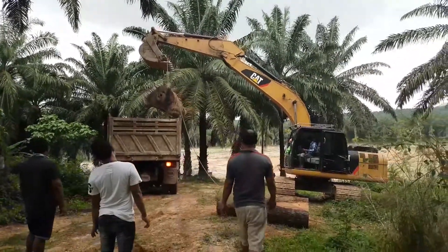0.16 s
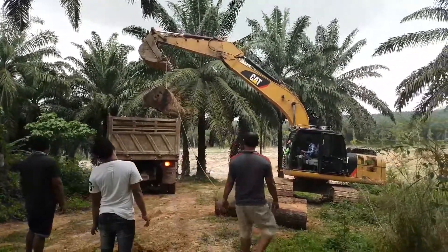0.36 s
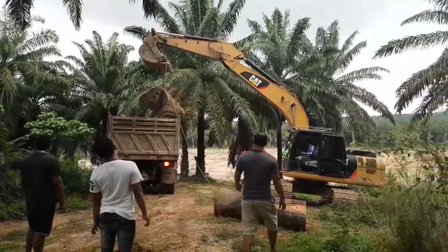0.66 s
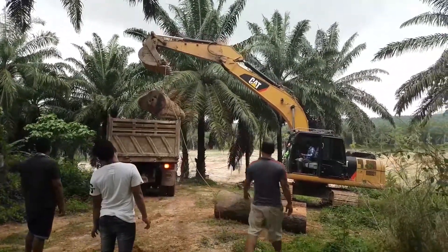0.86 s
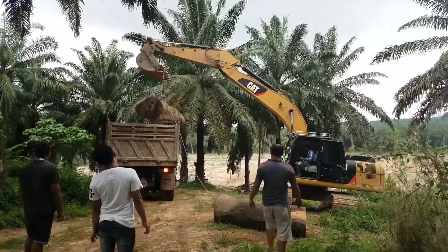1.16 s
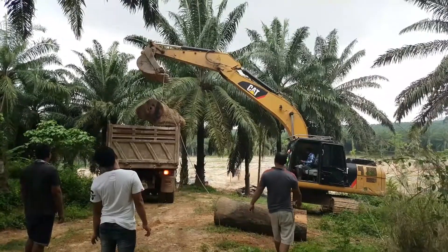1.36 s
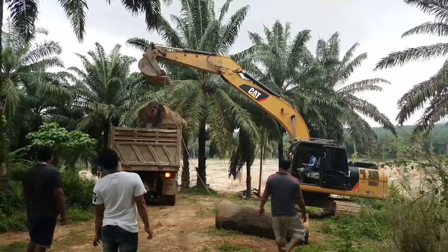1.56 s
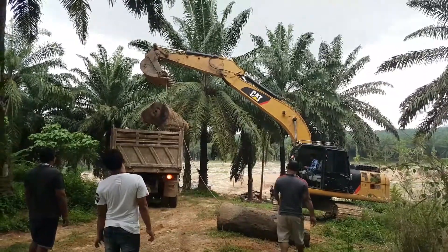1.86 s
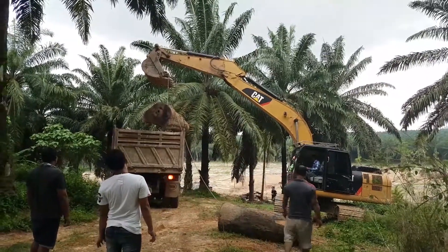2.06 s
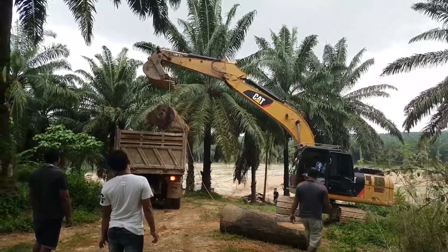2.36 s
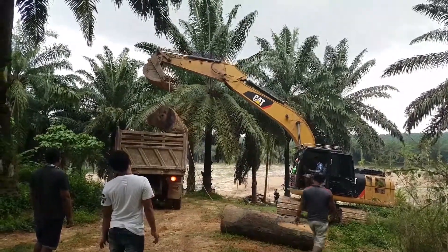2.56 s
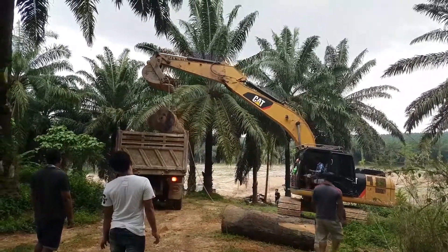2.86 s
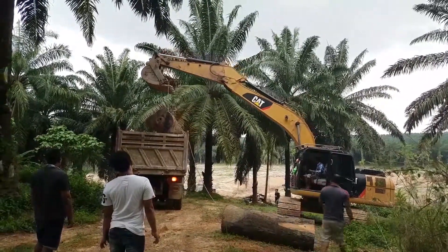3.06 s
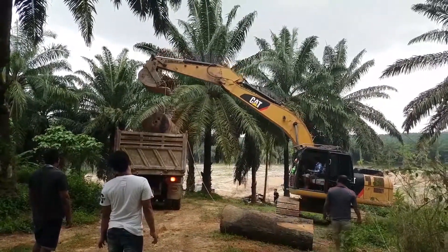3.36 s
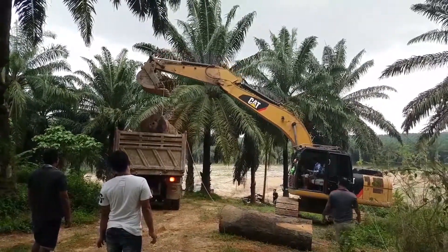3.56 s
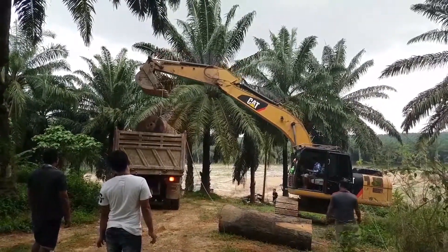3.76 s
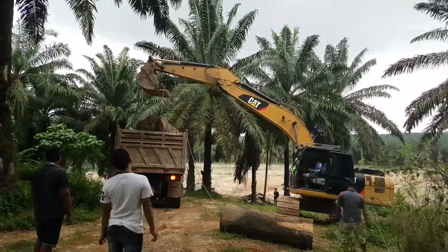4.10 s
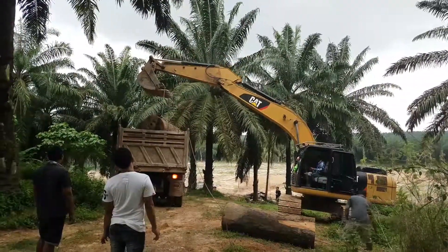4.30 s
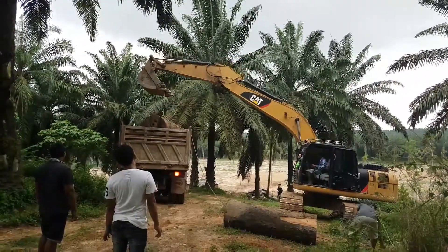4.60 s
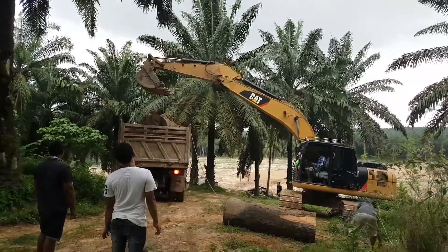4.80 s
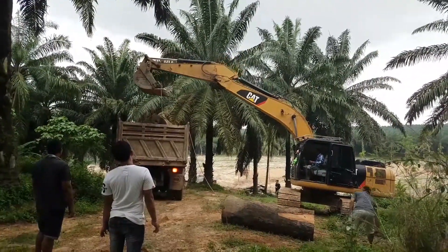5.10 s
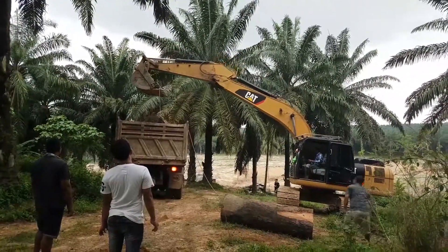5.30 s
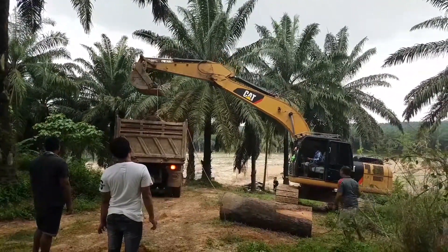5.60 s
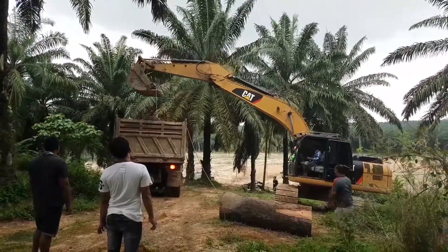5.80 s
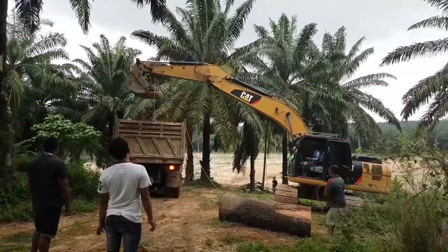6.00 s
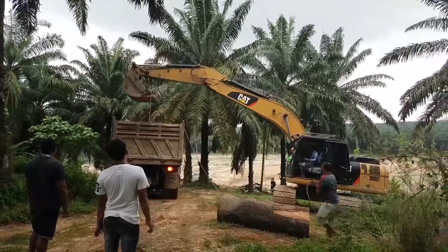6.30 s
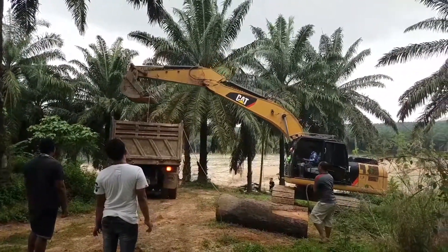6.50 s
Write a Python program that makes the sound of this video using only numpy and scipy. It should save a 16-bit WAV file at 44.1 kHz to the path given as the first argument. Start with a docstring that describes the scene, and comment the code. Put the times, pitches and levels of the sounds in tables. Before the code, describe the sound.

Strong low wind rumble buffets the microphone at first, then eases, returning in short gusts around four to five seconds. Beneath it a heavy diesel engine runs continuously at moderate distance, with a tonal hum, faint repeating valve clatter, hydraulic oil rush and fan noise. Wide, steady hiss from water and foliage fills both sides of the open-air stereo scene.

```python
"""The steady drone of a six-cylinder diesel excavator near 1300 rpm, some way off beside a river.
Firings and hydraulic pump hum as shaft-locked tones; the valve gear is a pattern repeated every cycle.
Shaped noise makes the fan rush, the oil flow and the low rumble of moving air that swells and ebbs.
River and leaves hiss all around the two microphone ports, and the top of the hiss brightens once."""
import sys
import numpy as np
from scipy import signal
from scipy.fft import rfft, irfft, next_fast_len
from scipy.io import wavfile
from scipy.ndimage import uniform_filter1d

SR = 44100
rng = np.random.default_rng(int(sys.argv[2]) if len(sys.argv) > 2 else 0)


def log_audio(samples):
    """Write samples as a 16-bit WAV file to the path given in sys.argv[1]."""
    # one column per channel
    frames = np.atleast_2d(samples).T
    # limit to full scale, then quantise
    limited = np.clip(frames, -1, 1)
    pcm = np.round(limited * 32767).astype(np.int16)
    wavfile.write(sys.argv[1], SR, pcm)


N = 293265

# crankshaft speed before hunting; it rises while the boom moves: time_s, speed_rpm
ENGINE_SPEED = [(0.0, 1327), (0.8, 1320), (1.2, 1306), (1.7, 1284), (2.2, 1277), (2.7, 1296), (3.2, 1287),
                (3.6, 1285), (4.0, 1353), (4.6, 1340), (5.2, 1294), (5.7, 1295), (6.65, 1288)]
REST_RPM, WORKING_RPM = 1295, 1341  # no load, full load


def undb(db):
    """Decibels to gain."""
    return 10 ** (np.asarray(db) / 20)


def unit(x):
    """Scale to rms 1."""
    return x / np.sqrt(np.mean(x ** 2))


def curves(table):
    """Each column of a timed table, sample by sample."""
    time_s, *columns = np.transpose(table)
    return [np.interp(np.arange(N) / SR, time_s, column) for column in columns]


def gain_at(points, hz):
    """Gain of a (Hz, dB) spectrum at given frequencies, interpolated over log frequency."""
    point_hz, point_db = np.transpose(points)
    return undb(np.interp(np.log(np.maximum(hz, 1)), np.log(point_hz), point_db))


def colour(x, points, power=1):
    """Filter by a spectrum whose gain is raised to a power."""
    size = next_fast_len(N)
    gain = gain_at(points, np.fft.rfftfreq(size, 1 / SR)) ** power
    return irfft(rfft(x, size) * gain, size)[..., :N]


def noise(points):
    """Noise of a given spectrum, rms 1."""
    return unit(colour(rng.standard_normal(N), points))


def walk(rate):
    """Smooth chance with about `rate` turns a second, rms 1."""
    values = rng.standard_normal(1024)
    joined = np.interp(np.arange(N) / SR * rate, np.arange(1024), values)
    return unit(uniform_filter1d(joined, int(SR / rate / 2)))


def swell(peak_s, length_s):
    """A smooth rise to 1 and back, once."""
    return np.cos(np.pi * np.clip((np.arange(N) / SR - peak_s) / length_s, -.5, .5))


def steady(x, window_s=.085):
    """Even out the chance swells of a noise, keeping its fast grain."""
    return x / np.sqrt(uniform_filter1d(x ** 2, int(window_s * SR)))


def scatter(x, echo=0.069, spread_s=.025, count=20):
    """Faint short echoes give the hiss a finely rippled colour."""
    lags = (rng.uniform(.1, 1, count) * spread_s * SR).astype(int)
    echoes = sum(np.roll(x, lag) for lag in lags)
    return unit(x + echo * echoes)


def ports(x, lag_s):
    """One source at two ports; it stands to the right, so the left port hears it later."""
    t = np.arange(N) / SR
    return np.array([np.interp(t - lag_s, t, x), x])


def engine_load():
    """Load read from the engine speed: 0 at rest, 1 while the boom is working."""
    above_rest = curves(ENGINE_SPEED)[0] - REST_RPM
    return np.clip(above_rest / max(WORKING_RPM - REST_RPM, 1), 0, 1)


def river(flutter_db=0.37):
    """Water and leaves hiss from all sides, unrelated at the two ports."""
    # hiss spectrum, relative: frequency_hz, density_db
    hiss_spectrum = [(200, 1.5), (900, -5.5), (1400, 2), (2400, 2.5), (3150, -3.5), (4050, -2.5),
                     (5000, -6), (5700, -10), (8200, -11), (9300, -19), (10400, -17), (11600, -13.5),
                     (13300, -16), (16000, -16.5)]
    # balance of the hiss, left minus right: frequency_hz, difference_db
    hiss_balance = [(500, 0), (1200, 2.5), (1800, -5.5), (2500, -2), (4000, -4.5), (6000, -2.5), (8000, 0),
                    (9400, -0.5), (11500, -1), (15000, -3)]
    # hiss level before the flutter: time_s, level_db
    hiss_level = [(0, -44), (.6, -42.5), (2.6, -41.5), (4.4, -43.5), (4.67, -41.4), (4.9, -42.5),
                  (6.65, -42)]
    # half of the balance goes to each port, with opposite sign
    left = colour(scatter(noise(hiss_spectrum)), hiss_balance, .5)
    right = colour(scatter(noise(hiss_spectrum)), hiss_balance, -.5)
    return np.array([left, right]) * undb(curves(hiss_level)[0] + flutter_db * walk(11))


def sizzle(peak_s=2.373, length_s=.85, peak_db=-57):
    """The top of the hiss brightens for a moment: a high noise band, unrelated at the ports."""
    band = [(6000, -30), (9500, 0), (13500, 5), (16000, -9)]
    return np.array([noise(band), noise(band)]) * undb(peak_db) * swell(peak_s, length_s)


def rumble(pan_db=-0.27, deep_waver_db=1.0):
    """Breeze and gusts drive rumble and burble together over a deep bass, nearly alike at both ports."""
    # spectra of the rumble, the deep bass and the rough burble above, relative: frequency_hz, density_db
    rumble_spectrum = [(18, -23), (30, -22), (45, -21), (68, -17), (90, 1), (108, -3.5), (128, 1.5),
                       (155, -4.5), (200, -10.5), (260, -17), (380, -29), (600, -37), (1500, -78)]
    deep_spectrum = [(15, -30), (25, -25), (35, -7), (52, -5), (72, 8.5), (100, -0.5), (160, -19),
                     (400, -67.5)]
    burble_spectrum = [(130, -55), (190, -5.5), (222, -2), (260, -4.5), (305, -4), (350, -22), (430, -14),
                       (520, -19.5), (1000, -66)]
    # filter for the part that differs between the ports: frequency_hz, gain_db
    side_filter = [(30, -24), (80, -20.5), (160, -18.5), (300, -9.5), (600, -8)]
    # strength of the breeze, as its rumble level before gusts: time_s, level_db
    breeze = [(0, -19), (.7, -20.5), (1.4, -26.5), (2.05, -26.5), (2.55, -29), (3.35, -26.5), (3.7, -30),
              (4.2, -28), (4.9, -23.5), (5.7, -30), (6.3, -29.5), (6.65, -35.5)]
    # short gusts on top of the breeze: peak_s, length_s, rise_db
    gusts = [(.05, 0.057, 5.5), (0.166, .07, 4), (0.39, 0.18, 5), (0.596, 0.13, 4.5), (1.897, 0.32, 2.5),
             (2.74, 0.11, 5.5), (3.14, 0.19, 2), (3.94, 0.19, 5), (4.17, 0.2, 6.5), (4.667, 0.16, 4.5),
             (5.031, 0.14, 1.5)]
    # level of the deep bass before its waver: time_s, level_db
    deep_level = [(0, -25.5), (.8, -29), (1.05, -45), (1.5, -39), (1.9, -28), (3.25, -28), (3.7, -34.5),
                  (4.0, -28), (4.85, -28), (5.25, -38), (6.65, -39)]
    calm_db, burble_rest_db = -29, -39.5  # wind level at which the unloaded burble rests, and that level
    burble_slope, burble_load_db = 0.38, 3  # dB per dB of wind, rise under full engine load

    wind_db = curves(breeze)[0] + sum(db * swell(s, length) for s, length, db in gusts)
    wind = undb(wind_db)
    deep = undb(curves(deep_level)[0] + deep_waver_db * walk(4.24))
    burble = undb(burble_rest_db + burble_slope * (wind_db - calm_db) + burble_load_db * engine_load())

    # even out the grain of the bass, then give it back its intended level
    core = wind * noise(rumble_spectrum) + deep * noise(deep_spectrum)
    core_level = np.hypot(wind, deep)
    mid = steady(core / core_level) * core_level + burble * noise(burble_spectrum)
    side = colour(wind * noise(rumble_spectrum) + burble * noise(burble_spectrum), side_filter)
    return np.array([(mid + side) * undb(pan_db), mid - side])


def oil_flow():
    """Oil rushing through the hydraulic valves, a noise band near 1 kHz."""
    return noise([(400, -34), (750, -2.5), (1000, 7.0), (1110, 2), (1220, -6.0), (2000, -8.0), (4000, -32.5)])


def fan(cycle, throb=0.033, flutter_db=1.0):
    """Fan and exhaust gas rush, throbbing at each of the six firings."""
    # rush spectrum, relative: frequency_hz, density_db
    rush_spectrum = [(100, -14), (300, -1), (400, 0), (480, -4), (600, 3), (680, -2), (790, -4.5),
                     (1020, -2.5), (1170, -10.5), (1400, -6), (1650, -19), (2300, -15), (3000, -32),
                     (4000, -17.5), (9000, -42.5)]
    firing = np.cos(2 * np.pi * 6 * cycle)
    return noise(rush_spectrum) * (1 + throb * firing) * undb(flutter_db * walk(12))


def clatter(cycle, cycle_hz, change=0.54, size=8192):
    """Valves and injectors ring the block in the same pattern every cycle; the pattern slowly shifts."""
    # ringing spectrum, relative: frequency_hz, density_db
    ring_spectrum = [(150, 1), (420, 5), (490, -7.5), (650, 4.5), (740, 2), (1020, -10.5), (1180, -9),
                     (1380, 1), (1600, -23), (2300, -13), (3000, -28), (5000, -39)]
    shape = gain_at(ring_spectrum, np.arange(size // 2 + 1) * cycle_hz)
    shape[0] = 0
    out = 0
    # one fixed pattern and two whose weights drift
    for weight in (1, change * walk(2.0), change * walk(5)):
        random_phase = np.exp(2j * np.pi * rng.random(len(shape)))
        pattern = unit(irfft(shape * random_phase))
        out = out + weight * np.interp(cycle % 1 * size, np.arange(size), pattern)
    return unit(out)


def line(cycle, order, db, waver_db=1.0, wander_turns=0.00075):
    """A tone locked to the shaft; the air on the way makes it waver, phase most at high orders."""
    wandering_cycle = cycle + wander_turns * walk(6)
    phase = 2 * np.pi * (round(order) * wandering_cycle + rng.random())
    return np.sqrt(2) * undb(db + waver_db * walk(2.965)) * np.sin(phase)


def hum(cycle, load):
    """Exhaust and shaft lines, and the octave of the pump's piston rate; all stand out more at rest."""
    # strong lines of the four-stroke cycle, 6 = firing, 18 = nine pump pistons;
    # order (multiple of the cycle rate), level_db (rms, before trim, load and waver)
    shaft_lines = [(6, -34), (12, -43.5), (17, -34), (18, -37), (21, -46), (23, -52.5), (49, -58.5),
                   (51, -56), (54, -51), (60, -56), (62, -53), (63, -60.5), (72, -60), (84, -60), (91, -61),
                   (93, -60.5), (102, -56.5), (117, -62.5), (129, -69), (162, -67), (219, -73), (252, -57)]
    trim_db, lines_load_db = 1.26, -3.5  # all shaft lines: trim at rest, change under full load
    pump_order, pump_db, pump_load_db = 36, -47.5, -4  # pump octave: level at rest, change under full load
    lines_db = trim_db + lines_load_db * load
    lines = sum(line(cycle, order, db + lines_db) for order, db in shaft_lines)
    return lines + line(cycle, pump_order, pump_db + pump_load_db * load)


def excavator(clatter_db=-6.5, fan_db=-0.06, hunt=0.00507):
    """All parts follow one cycle of two crankshaft turns; under load the speed hunts and the lines blur."""
    # oil flow through the valves: time_s, level_db
    oil_level = [(0, -48), (1.4, -42.5), (3.3, -50), (4.1, -56.5), (4.7, -57), (5.5, -50.5), (6.65, -49.5)]
    body_db, body_load_db = -40, 1.4  # clatter and fan together: gain at rest, change under full load
    port_lag_s = 0.00015

    load = engine_load()
    rpm = curves(ENGINE_SPEED)[0] * (1 + hunt * load * walk(9))
    cycle_hz = rpm / 120  # two turns a cycle, 60 s a minute
    cycle = np.cumsum(cycle_hz) / SR

    body = undb(clatter_db) * clatter(cycle, cycle_hz.mean()) + undb(fan_db) * fan(cycle)
    body = undb(body_db + body_load_db * load) * body
    oil = undb(curves(oil_level)[0]) * oil_flow()
    return ports(hum(cycle, load) + body + oil, port_lag_s)


def scene():
    """The machine in its surroundings, at the two microphone ports."""
    return river() + sizzle() + rumble() + excavator()


def record(dry, fade_s=.0015, top_hz=15550):
    """A tiny fade-in keeps the filter from clicking at the start; the top is cut steeply."""
    fade = np.minimum(np.arange(N) / SR / fade_s, 1)
    low_pass = signal.ellip(12, .1, 80, top_hz, fs=SR, output="sos")  # ripple 0.1 dB, stopband 80 dB down
    return signal.sosfilt(low_pass, dry * fade)


dry = scene()
out = record(dry)
log_audio(out)
```